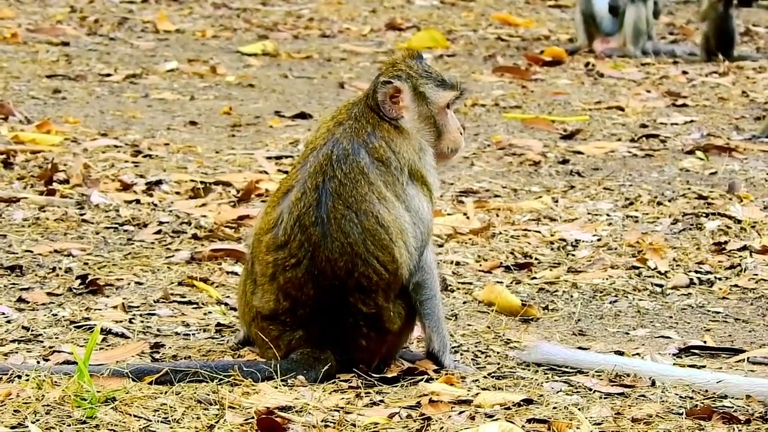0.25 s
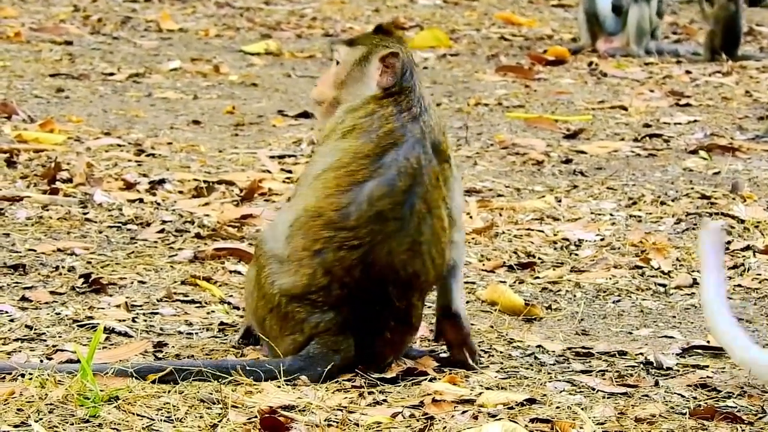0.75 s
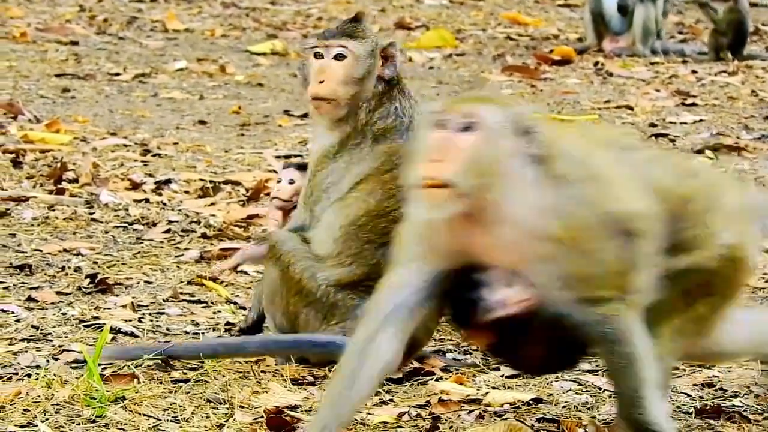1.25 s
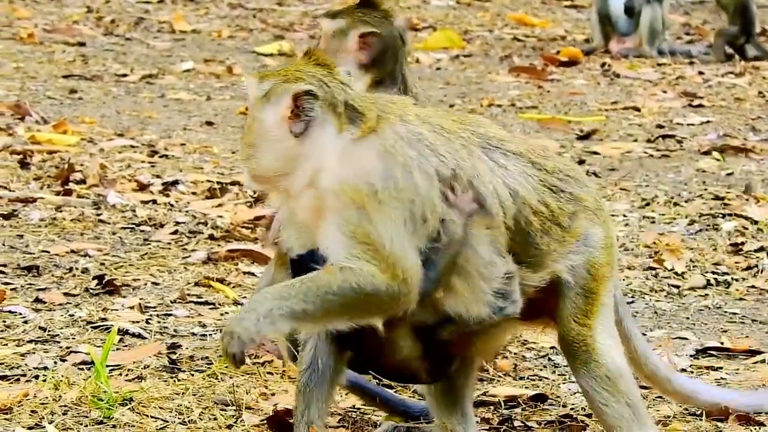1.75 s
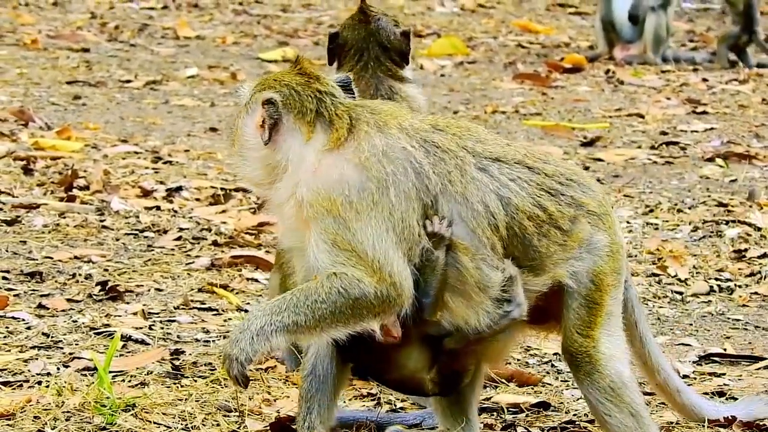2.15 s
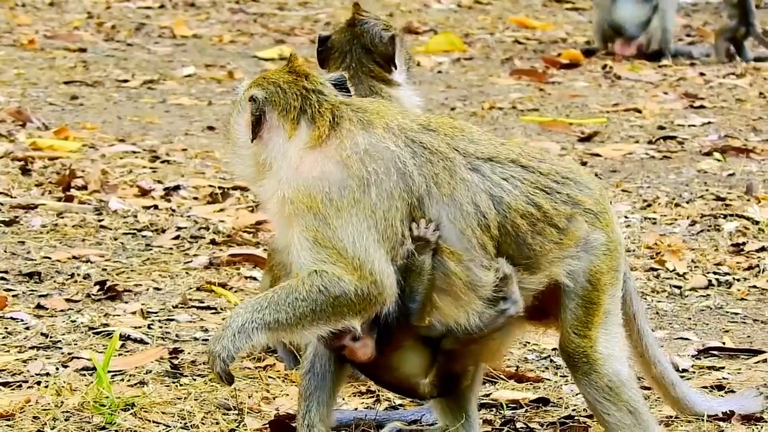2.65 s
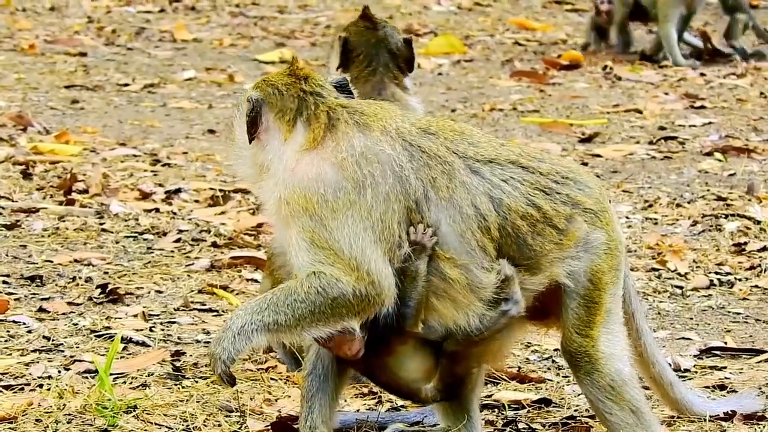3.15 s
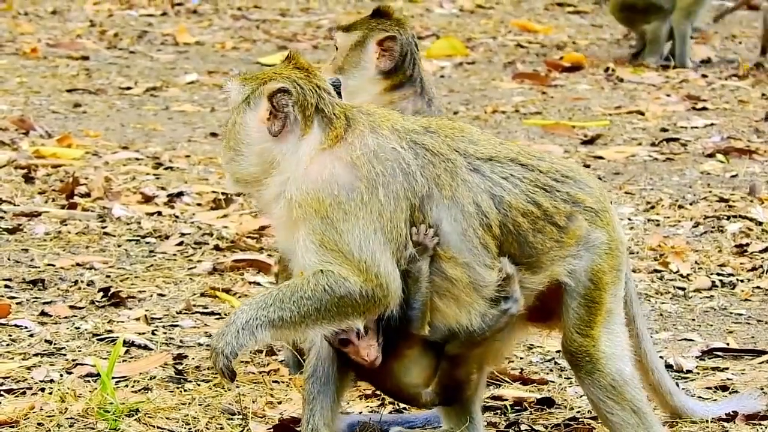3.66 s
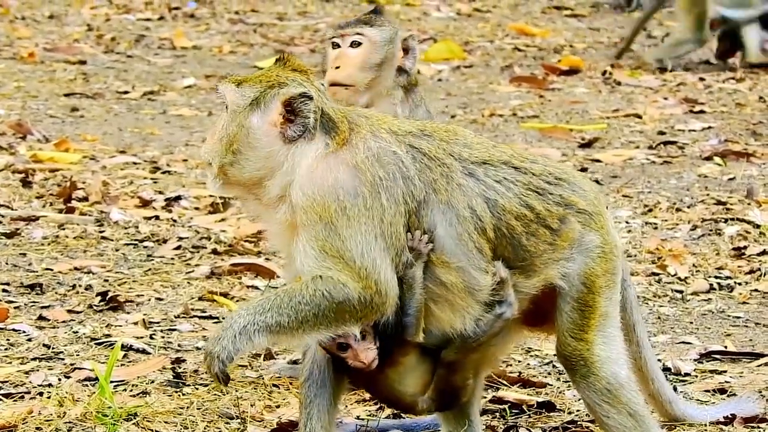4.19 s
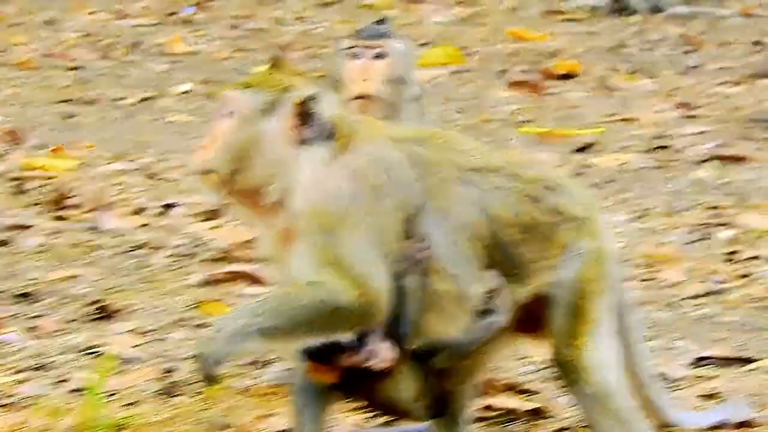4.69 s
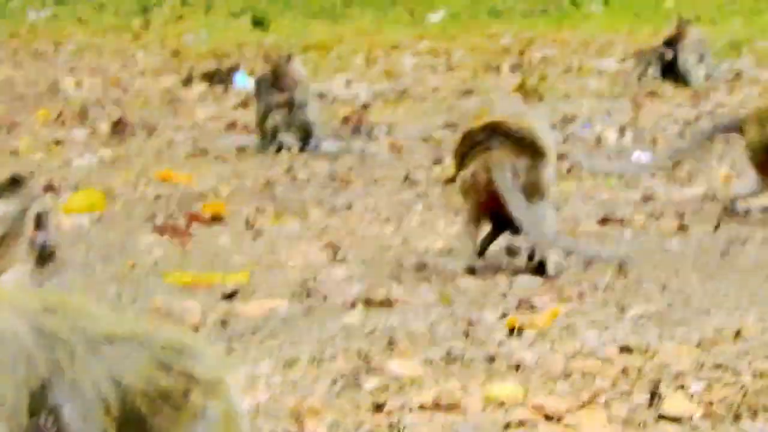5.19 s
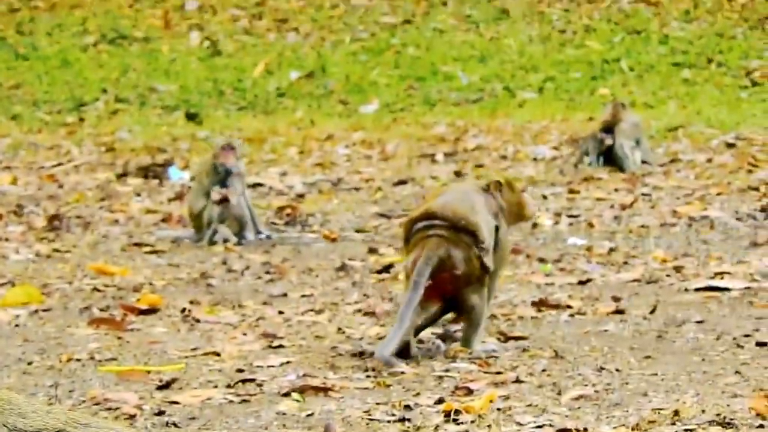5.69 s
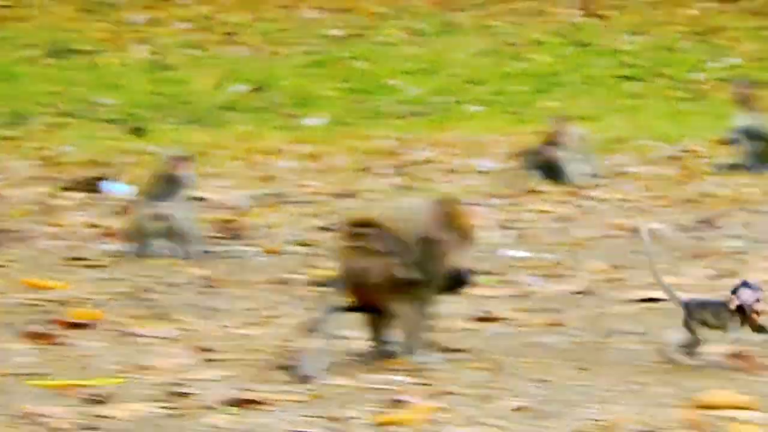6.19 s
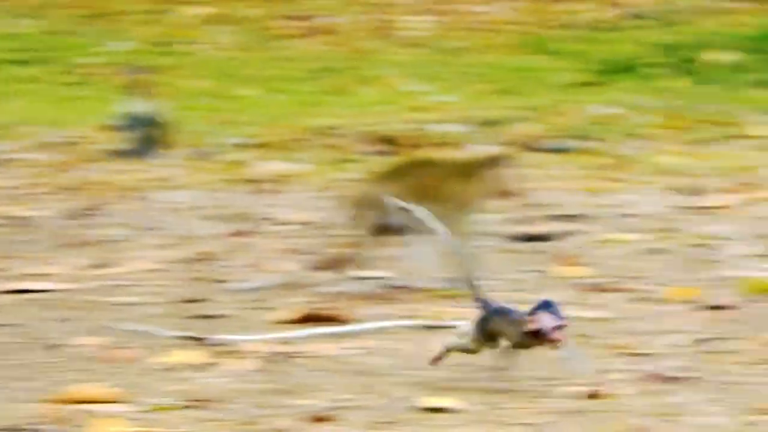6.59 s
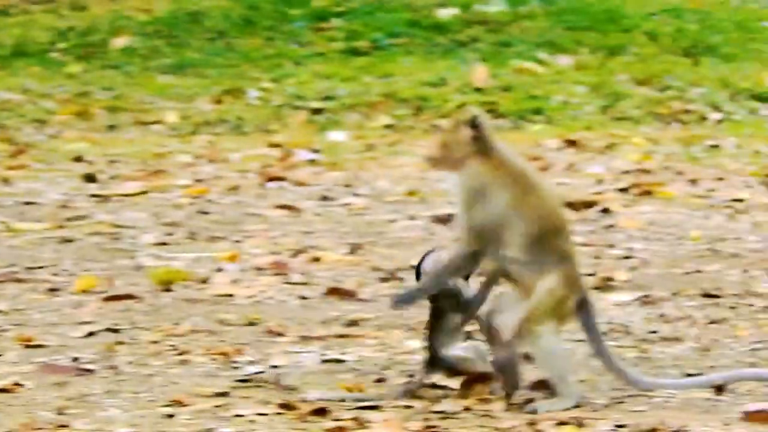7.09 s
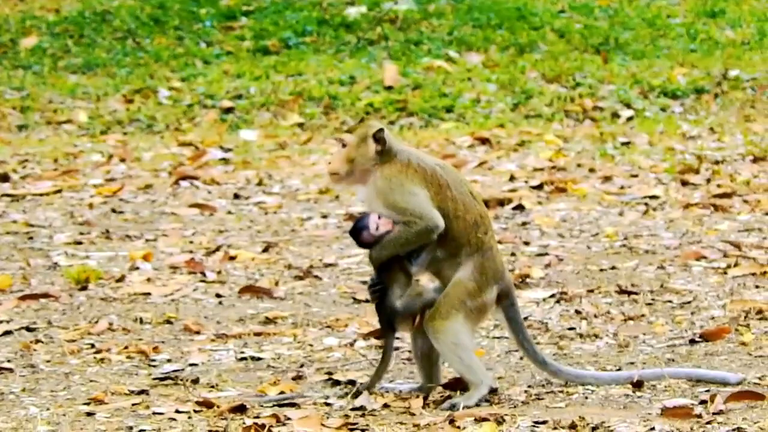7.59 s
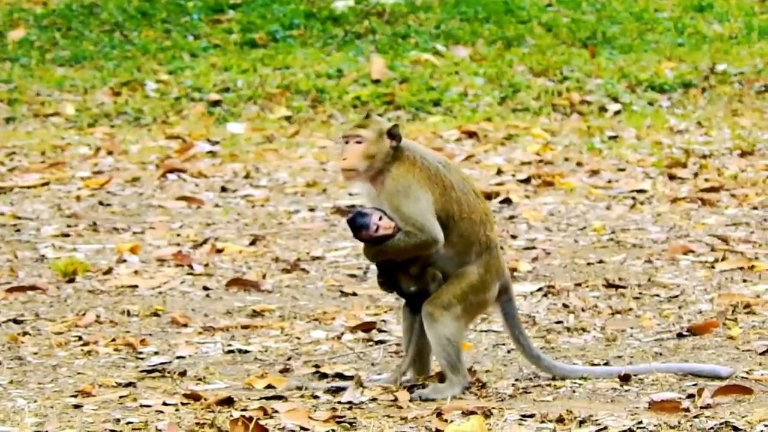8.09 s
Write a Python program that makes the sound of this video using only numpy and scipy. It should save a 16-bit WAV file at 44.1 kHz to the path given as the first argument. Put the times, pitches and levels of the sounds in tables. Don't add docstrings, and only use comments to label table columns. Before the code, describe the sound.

A quiet open-air bed of far traffic hum, troop murmur and leaf rustle, picked up in stereo by a microphone that swings away midway. A clipped bark opens, high insect ticks and leafy footsteps follow, then a distant raspy screech. A baby monkey's unsteady, squeaky whine fills the middle with a bright chirp cutting in. Near the end it cries out, whistles, sobs and shrieks loudly, leaving echoing far yaps.

```python
import sys
import numpy as np
from scipy import signal
from scipy.fft import rfft, irfft, next_fast_len
from scipy.io import wavfile
from scipy.ndimage import map_coordinates

SR = 44100
rng = np.random.default_rng(int(sys.argv[2]) if len(sys.argv) > 2 else 0)


def attenuation_scalar(level_db):
    decades = np.asarray(level_db, float) / 20
    return 10 ** decades


def log_audio(samples):
    frames = np.atleast_2d(samples).T
    limited = np.clip(frames, -1, 1)
    pcm = np.round(limited * 32767).astype(np.int16)
    wavfile.write(sys.argv[1], SR, pcm)


N = 368171
T = np.arange(N) / SR

# start_s, length_s, first_hz, last_hz, peak_db
NOTES = [
    (0.183, 0.031, 1524, 1477, -37),
    (0.266, .032, 2600, 2080, -32),
    (2.229, .014, 2200, 2300, -45),
    (2.53, 0.12, 2260, 2170, -62),
    (3.004, 0.061, 5250, 5750, -56),
    (.244, .03, 1600, 1380, -41),
]
# frequency_hz, level_db
NOTE_THROAT = [(1000, -10), (1500, 10), (3000, 12), (4500, -7.5), (6000, -23), (7500, -38), (9000, -46),
               (12000, -65)]
# start_s, rise_s, hold_s, fall_s, peak_db
RASP = [
    (3.07, 0.028, 0.15, 0.12, -54.5),
    (7.03, .03, 0.15, .16, -66),
]
# centre_hz, width_hz, level_db
RASP_THROAT = [(7300, 900, -10), (9300, 800, 0), (10600, 600, -3), (12300, 700, -12), (13700, 900, -7)]
# centre_hz, width_hz, level_db
SHRIEK_THROAT = [(3500, 700, 0), (4450, 800, -1), (5800, 900, -1), (8600, 1400, -20), (12000, 2000, -34)]
# frequency_hz, level_db
CRY_THROAT = [(1500, -55), (3100, -38), (3550, -4), (4500, -4), (5700, 0), (6800, -8), (7800, -28),
              (10500, -46), (12500, -68), (16000, -75)]


def unit(x):
    return x / np.sqrt(np.mean(np.abs(x) ** 2))


def walk(rate_hz, count=N):
    size = next_fast_len(count)
    bell = np.exp(-(np.fft.rfftfreq(size, 1 / SR) / rate_hz) ** 2)
    return unit(irfft(rfft(rng.standard_normal(size)) * bell, size)[:count])


def gain(points, hz):
    f, db = np.transpose(points)
    return attenuation_scalar(np.interp(np.log(hz + 1), np.log(f), db))


def dull(x, top_hz):
    return signal.sosfilt(signal.butter(6, top_hz, fs=SR, output="sos"), x)


def span(table):
    s, *columns = np.transpose(table)
    at = slice(max(int(s[0] * SR), 0), min(int(s[-1] * SR), N))
    edge = np.clip(np.minimum(T[at] - s[0], s[-1] - T[at]) / 0.0015, 0, 1)
    return at, [np.interp(T[at], s, c) for c in columns], edge


def glide(row, rough, peak_at, start_db, end_db):
    s, length, first_hz, last_hz, db = row
    shape = [(0, start_db, 1.5), (np.clip(peak_at, .05, .95), 0, 1), (1, end_db, 1.5)]
    return [(s + a * length, first_hz + a * (last_hz - first_hz), db + drop, rough * r)
            for a, drop, r in shape]


def burst(row, start_db, sag_db, end_db):
    s, rise, hold, fall, db = row
    return list(zip(s + np.cumsum([0, rise, hold, fall]), db + np.array([start_db, 0, sag_db, end_db])))


def partials(hz, shares, smear, wobble):
    n = len(hz)
    hz = hz * (1 + wobble * walk(28, count=n) + .9 * wobble * walk(110, count=n))
    phase = 2 * np.pi * np.cumsum(hz) / SR
    for k, share in enumerate(np.clip(shares, 0, 1), start=1):
        width_hz = max(smear * np.sqrt(k - 1) * 2, .09) * np.mean(hz)
        flutter = (walk(width_hz, count=n) + 1j * walk(width_hz, count=n)) / np.sqrt(2)
        line = np.sqrt(1 - share) + np.sqrt(share) * flutter
        tone = line * np.exp(1j * (k * phase + k ** 2))
        yield k * hz, np.sqrt(2) * tone.imag * (k * hz < .45 * SR)


def call(table, throat, wobble, voice_db=np.zeros(12)):
    out, (at, (hz, db, rough), edge) = np.zeros(N), span(table)
    stack = partials(hz, np.tile(rough, (len(voice_db), 1)), 0.16, wobble)
    lines = [(attenuation_scalar(v) * gain(throat, f), tone) for v, (f, tone) in zip(voice_db, stack)]
    voice = sum(g * tone for g, tone in lines)
    out[at] = edge * attenuation_scalar(db) * voice / np.sqrt(sum(g ** 2 for g, _ in lines))
    return out


def note(row):
    table = glide(row, rough=0.21, peak_at=0.25, start_db=0.5, end_db=-15)
    return call(table, NOTE_THROAT, 0.0049)


def whine(table, smear, fourth_db, falter_db, rough, third_db, ceiling_db, wobble):
    out, (at, (hz, db, closure), edge) = np.zeros(N), span(table)
    n = len(hz)
    first_db = -33 + 48.5 * closure
    rough = rough + 0.13 * closure
    rough = rough + .3 * np.maximum(walk(9, count=n), 0)
    third_db = np.minimum(third_db - db, ceiling_db)
    shares = np.array([.8 + rough / 4, rough, .7 + rough, .6 + rough])
    first, second, third, fourth = (tone for _, tone in partials(hz, shares, smear, wobble))
    third = attenuation_scalar(3.5 * walk(9, count=n)) * dull(third, 12000)
    fourth = attenuation_scalar(3.5 * walk(9, count=n)) * attenuation_scalar(fourth_db) * fourth / (1 + (hz / 3680) ** 80)
    stack = attenuation_scalar(first_db) * first + second + attenuation_scalar(third_db) * (third + fourth)
    out[at] = edge * attenuation_scalar(db + falter_db * walk(30, count=n)) * stack
    return out


def ragged(table, throat, rate_hz, breath):
    out, (at, (db,), edge) = np.zeros(N), span(table)
    n = len(db)
    chance = rng.standard_normal((n // 20, 2))
    when = np.cumsum(SR / rate_hz * np.exp(.4 * chance[:, 0])).astype(int)
    pulses = np.zeros(n)
    pulses[when[when < n]] = attenuation_scalar(5.7 * chance[when < n, 1])
    source = unit(pulses) + breath * rng.standard_normal(n)
    f = np.fft.rfftfreq(n, 1 / SR)
    colour = sum((-1) ** k * attenuation_scalar(g) / (1 + 1j * (f - hz) / width) ** 3
                 for k, (hz, width, g) in enumerate(throat))
    colour = colour / (1 + (.8 * throat[0][0] / (f + 1)) ** 12)
    out[at] = edge * attenuation_scalar(db) * unit(irfft(rfft(source) * colour, n))
    return out


def bursts(events, source, rise_s, fall_s):
    envelope = sum(attenuation_scalar(db) * np.exp(-np.abs(T - s) / np.where(T < s, rise_s, fall_s)) for s, db in events)
    return envelope * source


def hiss(outline, alike, flicker_db, rate_hz, grain_db=0.):
    size = next_fast_len(N)
    f, out = np.fft.rfftfreq(size, 1 / SR), 0
    noise = rng.standard_normal((2, N)) * attenuation_scalar(grain_db * rng.exponential(size=N))
    pair = np.sqrt(alike) * noise[0] + np.sqrt(1 - alike) * np.array([noise[1], -noise[1]])
    shaped = rfft(pair, size) * gain(outline, f) * (f > outline[0][0]) * (f < outline[-1][0])
    band = np.floor(2 * np.log2(f + 1))
    for b in np.unique(band[np.abs(shaped[0]) > 0]):
        out = out + irfft(shaped * (band == b), size)[:, :N] * attenuation_scalar(flicker_db * walk(rate_hz))
    return unit(out)


def trunks(x, t60_s):
    t = np.arange(int(.9 * SR)) / SR
    noise = rng.standard_normal((3, len(t)))
    fade = np.exp(-np.log(1000) * t / t60_s) * (1 - np.exp(-t / 0.0014))
    tail = (noise[0] + noise[1:]) * fade
    tail = signal.lfilter(*signal.butter(3, 6800, fs=SR), tail)
    return signal.fftconvolve(x[None], unit(tail) / np.sqrt(len(t)), axes=1)[:, :N]


def place(x, pan_db):
    return x * attenuation_scalar(np.array([[.5], [-.5]]) * pan_db)


def aside(pair, lead_s):
    late = map_coordinates(pair[1], [(T - lead_s) * SR], mode="mirror")
    return np.array([pair[0], late])


def background():
    # time_s, level_db
    stir = [(0.0, -64), (0.45, -57), (0.76, -61.5), (1.72, -59.5), (2.42, -49), (2.6, -57), (2.93, -65),
            (3.7, -60), (3.77, -57.5), (3.86, -56.5), (4.3, -69), (5.1, -69), (5.55, -56.5), (5.8, -72),
            (6.55, -75), (6.73, -63), (6.92, -65.5), (7.16, -76), (7.53, -48.5), (7.9, -76.5), (8.1, -80)]
    # time_s, turn (0-1)
    swing = [
        (3.5, 0.02),
        (4.4, 0.07),
        (5.55, 0.67),
        (5.7, 0.33),
        (7.05, 0.71),
        (7.15, 1),
        (8.35, 0.73),
    ]
    stir_db, turn = (np.interp(T, *np.transpose(table)) for table in (stir, swing))
    near_ground = troop_murmur(stir_db, turn) + leaf_litter(stir_db) + feet_rustle()
    near_ground = near_ground + insect() + leaf_crunch()
    return traffic(turn) + place(near_ground, 4 * np.minimum(turn / .25, 1))


def traffic(turn):
    # frequency_hz, density_db
    hum = [(15, -65.5), (25, -30), (124, -0.5), (145, -3), (208, -11), (279, -13), (349, -15), (487, -23.5),
           (545, -22.5), (700, -27), (910, -21), (1540, -120)]
    # time_s, peak_db, rise_s, fall_s
    surges = [
        (.08, -57.5, 0.33, 0.38),
        (.81, -60, 0.013, 0.004),
        (2.32, -59.5, 0.093, 0.03),
        (3.51, -53, 0.079, 0.04),
        (3.86, -67, 0.18, 0.027),
        (4.04, -66, 0.053, .07),
        (4.86, -61.5, 0.12, 0.038),
        (5.07, -62.5, 0.058, 0.036),
        (5.55, -52.5, 0.12, 0.042),
    ]
    road = attenuation_scalar(-67 - 7.5 * turn)
    road = road + sum(bursts([(s, db)], 0.77, rise, fall) for s, db, rise, fall in surges)
    return place(road * hiss(hum, .997, 2.0, 18), 2.4)


def troop_murmur(stir_db, turn):
    # frequency_hz, density_db
    murmur = [(240, -36), (400, -16), (547, -12.5), (922, -7), (1040, -1.5), (1650, -6), (1800, -6.5),
              (3100, -12), (3800, -29), (4500, -2), (5200, -33), (7040, -120)]
    level_db = -63 - 6 * turn + 0.36 * (stir_db + 61)
    return attenuation_scalar(level_db) * hiss(murmur, .93, 3.2, 9)


def leaf_litter(stir_db):
    # frequency_hz, density_db
    leaf_hiss = [(1470, -21.5), (2500, -3.5), (2680, -7), (3200, -2.5), (3750, -3.5), (4500, -2),
                 (5640, -2.5), (6260, -5.5), (7000, -16.5), (9100, -50), (15400, -120)]
    return attenuation_scalar(stir_db) * hiss(leaf_hiss, .85, 2.2, 9)


def feet_rustle():
    # frequency_hz, density_db
    leaf_top = [(4000, -26.5), (6800, 0), (7790, -13), (10700, -22), (12200, -33), (13200, -45),
                (14000, -46.5)]
    arrive_s, rise_s, stay_s, fade_db_s = 1.41, 0.14, 0.55, 8.5
    feet_db = np.interp(T, [arrive_s, arrive_s + rise_s], [-71, -62.5])
    feet_db = feet_db - fade_db_s * np.maximum(T - arrive_s - rise_s - stay_s, 0)
    return attenuation_scalar(feet_db) * hiss(leaf_top, 0.32, 3.0, 15, grain_db=3.0)


def barker():
    # start_s, rise_s, hold_s, fall_s, peak_db
    barks = [
        (.225, 0.002, 0.021, 0.12, -36.5),
        (.238, 0.015, 0.053, 0.057, -47),
    ]
    # centre_hz, width_hz, level_db
    body_throat = [(1550, 380, -4), (2450, 600, 0), (4650, 500, -20), (6000, 600, -20), (7700, 500, -30)]
    top_throat = [(4750, 350, -3), (6000, 450, 0), (7700, 500, -14)]
    # time_s, peak_db
    claps = [
        (.228, -25),
        (.2365, -21),
        (.241, -27),
        (.247, -22.5),
        (.27, -25),
        (.298, -23),
        (.308, -22),
        (.311, -31),
    ]
    bark = note(NOTES[0]) + note(NOTES[1]) + note(NOTES[5])
    bark = bark + dull(ragged(burst(barks[0], -14, 0.92, -21), body_throat, 300, 0.48), 7600)
    bark = bark + attenuation_scalar(5.9 * walk(40)) * ragged(burst(barks[1], -7, -2.2, -14), top_throat, 300, 1.6)
    return bark + bursts(claps, np.sin(2 * np.pi * 2200 * T), 0.00054, 0.00069)


def chirper():
    # start_s, length_s, first_hz, last_hz, peak_db
    whistles = [
        (0.198, 0.018, 5940, 6100, -46),
        (2.952, 0.027, 4650, 6910, -46),
    ]
    # time_s, pitch_hz, level_db, roughness (0-1)
    lead_in = [(3.523, 7250, -50.5, 0), (3.535, 6840, -43.5, 0.1), (3.545, 7250, -36, 0),
               (3.55, 7730, -37, 0.2), (3.56, 8550, -43, .5)]
    big_chirp = [(3.546, 1980, -42.5, .6), (3.558, 2090, -37.5, .55), (3.582, 2010, -31.5, .5),
                 (3.587, 1974, -33.5, 0), (3.65, 1530, -37.5, 0), (3.66, 1480, -32.5, 0.07),
                 (3.667, 1450, -38, 0), (3.67, 1380, -52, .05), (3.684, 1320, -55, .1)]
    yelp = [(4.093, 1695, -56, 0.25), (4.108, 1530, -52, 0.25), (4.122, 1354, -50, .15),
            (4.14, 1284, -47, 0.4), (4.153, 1230, -56, 0.54)]
    arch = [(4.503, 1695, -60, 0.045), (4.512, 1790, -47, 0.018), (4.525, 1860, -63, .4),
            (4.54, 1860, -55, 0.4), (4.56, 1760, -54, 0.27), (4.574, 1666, -76, .2)]
    # frequency_hz, level_db
    whistle_throat = [(4000, 4.5), (8500, 7), (10000, -16), (13000, -41.5), (16000, -59)]
    chirp_throat = [(1500, -50), (3200, -30), (4000, -12), (4700, -5), (5900, 0), (7500, -1), (9500, -6),
                    (11500, -18), (13000, -40), (16000, -60)]
    yelp_throat = [(2000, -50), (3300, -30), (3900, -2), (5300, 2), (6100, -4), (6800, -18), (7800, -8),
                   (9200, -8), (10200, -30), (12000, -60)]
    chirp_voice = [-22, -6, -2.5, 0.5, -9, -14.5, -15, -31]
    arch_voice = [-40, -24, -15, 0, -30]
    pure = [glide(row, rough=0.088, peak_at=0.37, start_db=-3.5, end_db=-10.0) for row in whistles]
    out = sum(call(table, whistle_throat, 0.0019) for table in pure + [lead_in])
    out = out + call(big_chirp, chirp_throat, 0.0024, chirp_voice)
    breath = burst((3.542, .012, .04, .1, -57), -11, -1.5, -20)
    out = out + ragged(breath, RASP_THROAT, 600, 2.5)
    return out + call(yelp, yelp_throat, 0.0041) + call(arch, chirp_throat, 0.0061, arch_voice)


def insect():
    # time_s, peak_db
    ticks = [(0.4469, -57.5), (0.4953, -62), (0.5282, -60), (0.5771, -62), (0.6025, -51.5), (0.6519, -58),
             (0.6794, -71), (1.6492, -52.5), (1.6994, -58), (1.8644, -60), (1.919, -56), (1.9714, -53.5),
             (2.0023, -50), (2.0502, -49.5), (2.1585, -46.5), (2.1994, -73)]
    ring = np.sin(2 * np.pi * 6200 * T) * walk(300) + np.cos(2 * np.pi * 6200 * T) * walk(400)
    return bursts(ticks, ring, 0.0031, 0.021)


def leaf_crunch():
    # time_s, peak_db
    steps = [
        (1.4521, -73),
        (1.4744, -55.5),
        (1.5419, -60),
        (1.5808, -62),
        (1.6057, -54.5),
        (1.6487, -52),
        (.604, -66),
        (2.24, -53),
        (2.3076, -48),
    ]
    crackle_outline = [(2500, -12), (6000, 10.5), (9000, -3.0), (14500, -29)]
    crackle = hiss(crackle_outline, 0.63, 0.67, 16, grain_db=4.0)
    return bursts(steps, attenuation_scalar(4.0) * crackle, 0.0036, 0.018)


def far_screechers():
    # start_s, rise_s, hold_s, fall_s, peak_db
    screeches = [
        (2.237, 0.01, 0.092, 0.48, -44.5),
        (3.68, 0.039, 0.17, 0.03, -51.5),
        (5.302, 0.31, .02, .2, -61),
    ]
    # centre_hz, width_hz, level_db
    screech_throat = [(1290, 2100, -15.5), (2530, 1060, -8), (4730, 1030, 5), (6440, 880, 3.5),
                      (8360, 2200, -18), (12700, 1000, -38)]
    nearer = ragged(burst(screeches[0], -33, 7.3, -41.5), screech_throat, 500, 3.1)
    distant = sum(ragged(burst(row, -8.0, -0.48, -16.0), screech_throat, 500, 0.97) for row in screeches[1:])
    return note(NOTES[2]) + note(NOTES[3]) + dull(nearer, 10700) + dull(dull(distant, 8700), 8300)


def infant_whine():
    # time_s, pitch_hz, level_db, mouth_closure (0-1)
    start = [(2.975, 3723, -61.5, 0), (2.999, 4360, -59.5, 0.2), (3.01, 4550, -59, 0.2),
             (3.069, 4500, -63.5, 0.3), (3.085, 4640, -58, 0.36), (3.19, 4680, -56, 0.45),
             (3.281, 4660, -69.5, 0.68), (3.398, 4580, -73, 0.4), (3.42, 4440, -67.5, 0.1),
             (3.56, 4600, -82.5, .4)]
    sinking = [(3.56, 4700, -70, 0.61), (3.68, 4620, -62, 0.41), (3.766, 4530, -63, 0.37),
               (3.835, 4820, -70, 0.36), (3.894, 4490, -52, .3), (3.92, 4270, -51, .2),
               (3.958, 4650, -50, .2), (3.976, 4300, -58, .1), (4.015, 4215, -53, 0.054),
               (4.04, 4240, -51.5, .1), (4.052, 4310, -57, 0.43), (4.08, 4320, -59, 0.63),
               (4.165, 4200, -68, 0.73), (4.185, 3970, -57, 0.36), (4.235, 3950, -62, 0.33),
               (4.25, 3950, -71, 0.56), (4.29, 4040, -78, 0.72), (4.332, 4150, -75, 0.71),
               (4.49, 4140, -70, 0.58), (4.65, 4060, -93, 1)]
    swell = [(4.65, 4220, -90, 0.96), (4.756, 4130, -70.5, 0.62), (4.868, 4240, -63.5, 0.64),
             (4.994, 4170, -61, 0.57), (5.095, 4040, -51.5, 0.47), (5.112, 4410, -63.5, 0.93),
             (5.15, 4180, -56, 0.61), (5.185, 3750, -55, 0.27), (5.27, 3870, -87, .4)]
    short = [(5.36, 3510, -75, .5), (5.4, 3580, -60.5, 0.52), (5.43, 3710, -58, 0.38),
             (5.512, 3660, -55, .2), (5.538, 3470, -57, 0.18), (5.608, 3614, -58, 0.18),
             (5.68, 3680, -72, .4)]
    rising = [(5.68, 3660, -64, .35), (5.73, 3510, -66, .4), (5.784, 3730, -65, .35),
              (5.812, 3670, -54.5, 0.11), (5.85, 3670, -55, .1), (5.9, 3600, -54, 0.081),
              (5.934, 3630, -50, .02), (5.953, 3740, -47.5, .02), (5.975, 3650, -49, 0.018),
              (6.0, 3660, -55, .06), (6.035, 3700, -53, .06), (6.07, 3570, -56, 0.077),
              (6.114, 3700, -52.5, .08), (6.14, 3550, -49, 0.084), (6.162, 3580, -51.5, .1),
              (6.178, 3880, -53, 0.11), (6.208, 3680, -52, .1), (6.235, 3750, -51, .1),
              (6.265, 3930, -49, 0.032), (6.3, 3650, -52, 0.11), (6.326, 3870, -56, .12),
              (6.345, 3690, -52.5, 0.14), (6.37, 3770, -56.5, 0.39), (6.41, 3890, -54.5, 0.32),
              (6.45, 3840, -54.5, 0.34), (6.472, 3930, -53.5, .4), (6.492, 4190, -60.5, 0.66),
              (6.51, 4260, -60.5, .4), (6.53, 4040, -52, 0.33), (6.582, 4260, -61, 0.63),
              (6.622, 3990, -51, 0.36), (6.664, 4240, -61.5, 0.74), (6.69, 3880, -63, 0.53),
              (6.71, 3900, -50.5, 0.41), (6.735, 4080, -57, 0.62), (6.756, 4040, -61, .7),
              (6.782, 4470, -68, 0.73), (6.8, 4380, -69, 0.8), (6.82, 4300, -86, 0.85)]
    out = whine(start, 0.12, -10, 2.1, rough=0.41, third_db=-72.5, ceiling_db=0.5, wobble=0.0089)
    out = out + whine(sinking, .06, -2, 2.8, rough=0.085, third_db=-63.5, ceiling_db=4.5, wobble=0.006)
    out = out + whine(swell, 0.046, -4, 1.5, rough=-0.13, third_db=-71, ceiling_db=-22, wobble=0.01)
    out = out + whine(short, 0.025, -16, 2.7, rough=0.056, third_db=-90.5, ceiling_db=-22, wobble=0.0082)
    out = out + whine(rising, 0.048, -2, 2.36, rough=0.1, third_db=-78, ceiling_db=-25, wobble=0.0069)
    rasp = dull(ragged(burst(RASP[0], -14, -1.9, -17.5), RASP_THROAT, 560, 2.5), 14300)
    return out + attenuation_scalar(3.5 * walk(25)) * rasp


def breath_strands():
    # start_s, length_s, first_hz, last_hz, peak_db
    strands = [
        (7.012, 0.075, 7900, 12000, -59),
        (7.1, .07, 10200, 10600, -59),
        (7.14, .07, 8160, 12060, -68.5),
        (7.28, 0.058, 7200, 11200, -65.5),
        (7.5, 0.12, 14300, 14700, -74),
        (7.27, .06, 13200, 13400, -77.5),
        (5.16, .1, 15600, 13400, -84),
        (4.6, 0.26, 10800, 12200, -84),
        (6.5, 0.11, 11700, 8100, -61),
    ]
    tables = [glide(row, rough=0.98, peak_at=0.72, start_db=-4, end_db=-9) for row in strands]
    return sum(call(table, CRY_THROAT, 0.016, [0]) for table in tables)


def infant_cry():
    # time_s, pitch_hz, level_db, roughness (0-1)
    cry = [(6.971, 950, -56, .3), (6.977, 1125, -41, .1), (6.982, 1345, -36, .08), (6.987, 1740, -32, .05),
           (6.992, 2150, -32, .05), (6.996, 2550, -30, .05), (6.999, 2850, -33, .1), (7.001, 3000, -50, .1)]
    # time_s, pitch_hz, level_db, mouth_closure (0-1)
    sobs = [
        [(7.05, 3526, -56, 0.51), (7.1, 3675, -65.5, 0.7), (7.128, 3817, -62.5, 0.95),
         (7.2, 3560, -66.5, 1.035), (7.25, 3430, -72.5, 0.98), (7.275, 3440, -49, 0.55)],
        [(7.28, 3840, -66.5, 1), (7.33, 3920, -57, 0.87), (7.365, 3840, -57, 0.67), (7.39, 3887, -47.5, 0.4),
         (7.415, 3910, -49.5, 0.75), (7.448, 3490, -49, 0.76), (7.47, 3350, -47, 0.82),
         (7.485, 3490, -64.5, 0.83)],
    ]
    # start_s, rise_s, hold_s, fall_s, peak_db
    shriek = [
        (7.45, 0.034, 0.048, 0.01, -25),
    ]
    out = call(cry, CRY_THROAT, 0.0052)
    leap_breath = burst((7.016, .01, .04, .15, -49), -9.0, -2.5, -12.0)
    out = out + ragged(leap_breath, SHRIEK_THROAT, 700, 3.0)
    rasp = ragged(burst(RASP[1], -1.2, -1.6, -17.0), RASP_THROAT, 600, 2.5)
    out = out + attenuation_scalar(6.7 * walk(17.6)) * dull(dull(rasp, 13000), 13000)
    out = out + whine(sobs[0], 0.063, -36.5, 2.66, rough=0.92, third_db=-68.0, ceiling_db=-6.0, wobble=0.025)
    out = out + whine(sobs[1], 0.12, -25.5, 3.0, rough=0.075, third_db=-58.5, ceiling_db=-11.0, wobble=0.01)
    return out + dull(ragged(burst(shriek[0], -25.5, -1.5, -22.5), SHRIEK_THROAT, 700, 1.95), 12900)


def whistle_leap():
    # time_s, pitch_hz, level_db, roughness (0-1)
    leap = [(6.998, 3480, -39, 0), (7.004, 3710, -30, 0.1), (7.007, 4560, -32, .05),
            (7.012, 5650, -24.5, 0.2), (7.018, 5660, -25.5, 0.04), (7.022, 5830, -41.5, 0.5),
            (7.032, 6250, -35.5, 0.4), (7.042, 6770, -40.5, .5), (7.062, 7260, -51, .7)]
    return call(leap, CRY_THROAT, .008, [0, 3])


def far_yaps():
    # start_s, length_s, first_hz, last_hz, peak_db
    yaps = [
        (7.826, 0.032, 1700, 2200, -69),
        (7.92, 0.033, 2350, 2400, -71),
        (8.015, .05, 1380, 1250, -78),
        (8.327, 0.022, 2700, 2200, -67),
        (7.325, .05, 2700, 2700, -64),
    ]
    # start_s, length_s, first_hz, last_hz, peak_db
    peep = (7.78, 0.1, 3478, 3418, -78)
    tables = [glide(row, rough=0.96, peak_at=.3, start_db=3, end_db=-6.0) for row in yaps]
    out = sum(call(table, NOTE_THROAT, 0.066, [0, -22]) for table in tables)
    peep_table = glide(peep, rough=0.33, peak_at=0.53, start_db=-8, end_db=-11)
    return out + call(peep_table, NOTE_THROAT, 0.0041, [0])


def scene():
    ground = background()
    bark, chirps, far = barker(), chirper(), far_screechers()
    infant, high_note = infant_whine(), note(NOTES[4])
    cry = infant_cry() + breath_strands()
    leap, yaps = whistle_leap(), far_yaps()
    direct = aside(place(bark, 2.7), 3.2e-5) + aside(place(chirps, 1.3), -9e-6) + place(far, .4)
    direct = direct + aside(place(infant + high_note, 3.5), 7e-6)
    direct = direct + aside(place(cry + leap, 1.3), 7e-6) + place(yaps, 5.7)
    echo = attenuation_scalar(-11.5) * bark + attenuation_scalar(-8.5) * chirps + attenuation_scalar(-2.0) * far + attenuation_scalar(-9.5) * infant
    echo = echo + attenuation_scalar(-13.5) * cry + attenuation_scalar(-25) * leap + attenuation_scalar(1) * yaps
    return direct + trunks(echo, 0.54) + ground


def roll_off(x):
    return signal.sosfilt(signal.butter(12, 15620, fs=SR, output="sos"), x)


def record(dry):
    mix = dull(dry, 15700)
    return roll_off(mix)


dry = scene()
out = record(dry)
log_audio(out)
```